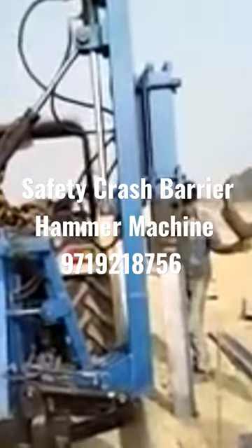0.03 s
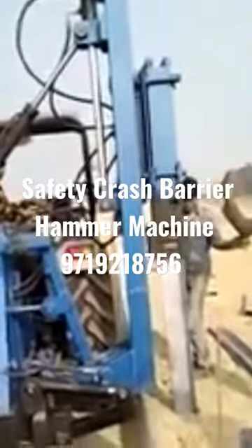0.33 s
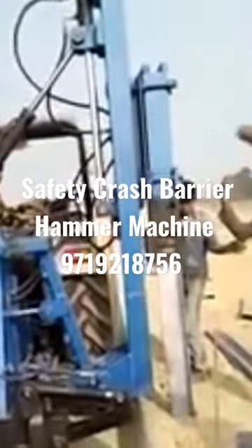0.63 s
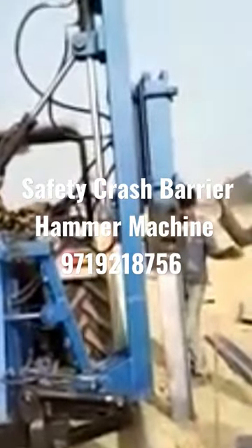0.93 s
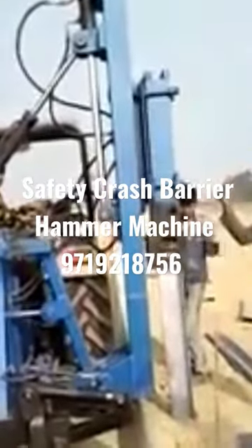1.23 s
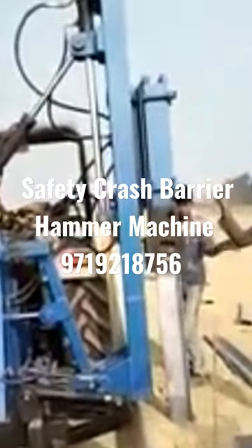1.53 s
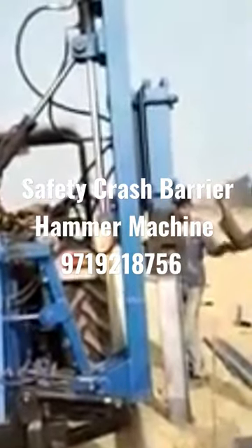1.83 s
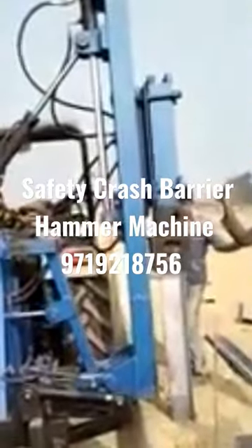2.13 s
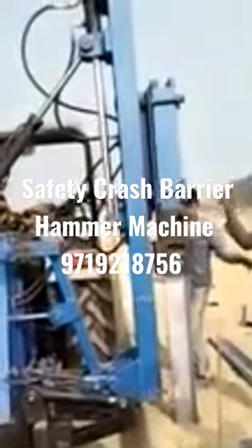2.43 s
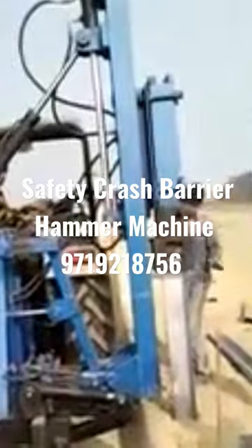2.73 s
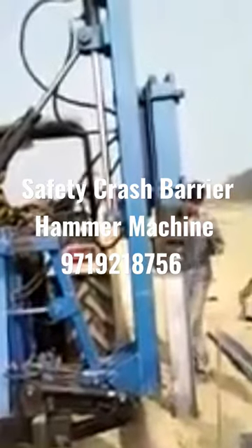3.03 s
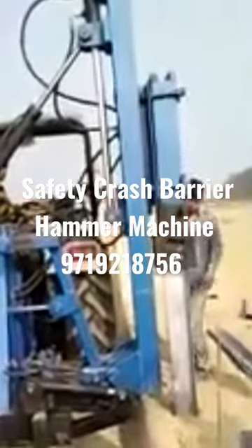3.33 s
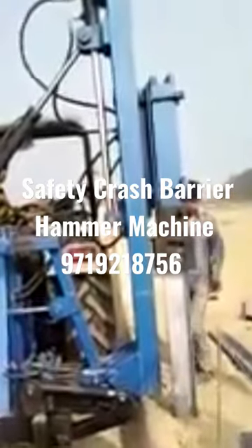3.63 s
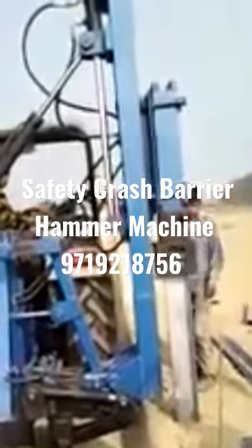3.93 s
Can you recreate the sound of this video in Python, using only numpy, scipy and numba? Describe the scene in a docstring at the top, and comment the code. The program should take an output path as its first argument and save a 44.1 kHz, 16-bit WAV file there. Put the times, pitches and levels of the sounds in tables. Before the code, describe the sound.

A hydraulic hammer pounds a steel post in fast, sharp, clattering blows that ring briefly, stalls for a moment midway, then carries on. A tractor's diesel engine rumbles steadily underneath, heard close by outdoors on a phone microphone.

```python
"""In the open air, close to a tractor whose hydraulic hammer drives a steel post; one phone microphone.
Nearly seven blows a second, with one short stall. Each cycle is a sharp valve tick, then the piston's
blow: post and hammer clatter and ring, and the hammer drops back with a knock.
The diesel runs on steadily underneath; the phone's gain control ducks it at every blow."""
import sys
import numpy as np
from scipy import signal
from scipy.fft import rfft, irfft
from scipy.io import wavfile
from numba import njit

SR = 44100
rng = np.random.default_rng(int(sys.argv[2]) if len(sys.argv) > 2 else 0)


def unload_wav(signal):
    """Save mono or channel-first audio to the path in sys.argv[1] as 16-bit WAV at rate SR, clipped to [-1, 1]."""
    wavfile.write(
        sys.argv[1],
        SR,
        np.round(np.clip(np.atleast_2d(signal).T, -1, 1) * 32767).astype(np.int16),
    )


N = 176400
AGE = np.arange(int(.4 * SR)) / SR  # seconds since a contact


def amp(db):
    """Decibels to gain."""
    return 10 ** (np.asarray(db) / 20)


def colour(x, points, size=4096):
    """Causal filter through (f/Hz, level/dB) points; white noise keeps its power."""
    hz, db = np.array(points, float).T
    bins_hz = np.arange(size // 2 + 1) * SR / size
    gain = amp(np.interp(np.log(bins_hz + 1), np.log(hz), db))
    cepstrum = irfft(np.log(gain / np.sqrt(np.mean(gain ** 2))))
    cepstrum[1:size // 2] *= 2  # fold to minimum phase
    cepstrum[size // 2 + 1:] = 0
    return signal.fftconvolve(x, irfft(np.exp(rfft(cepstrum))))[:len(x)]


def add(out, start_s, sound):
    """Mix a sound in at a time."""
    i = int(round(start_s * SR))
    part = sound[max(-i, 0):max(N - i, 0)]
    out[max(i, 0):max(i, 0) + len(part)] += part


def burst(db, decay_s):
    """A rough contact that dies away."""
    return amp(db) * np.exp(-AGE / decay_s) * rng.standard_normal(len(AGE))


def swell(rise_s):
    """Envelope that builds up to full level."""
    return 1 - np.exp(-AGE / rise_s)


def fade(hold_s, decay_s):
    """Envelope that holds, then dies away."""
    return np.exp(-np.maximum(AGE - hold_s, 0) / decay_s)


def ring(hz, db, t60):
    """One decaying mode."""
    return amp(db - 60 * AGE / t60) * np.sin(2 * np.pi * (hz * AGE + rng.random()))


# The diesel's firing rate: t/s, f/Hz
FIRING_RATE = [(0, 56.5), (.3, 58), (3.3, 57.5), (3.6, 57.5), (4, 57.5)]
# Spectra of the exhaust and of the pump and gears, as heard at the microphone: f/Hz, level/dB
EXHAUST_SPECTRUM = [(18, -9), (30, -13), (52, -20), (80, -2), (135, 0.5), (200, 1), (265, 1), (340, -3.5),
                    (450, -15), (900, -26.5), (15000, -70)]
GEAR_SPECTRUM = [(30, -23), (420, -11), (580, 1.5), (800, -0.5), (1100, -7), (1350, -4.5), (1700, -8.5),
                 (2500, -7.5), (3100, -17.5), (4000, -26), (5500, -24.5), (7000, -20.5), (8500, -29.5),
                 (11000, -32.5), (14000, -24), (15500, -35)]
def engine(drone_db=-33.5, exhaust_db=-28, gear_db=-25):
    """The bed of the scene: diesel drone, an exhaust puff at each firing, the noise of pump and gears."""
    firing_hz = np.interp(np.arange(N) / SR, *np.array(FIRING_RATE).T)
    phase = 2 * np.pi * np.cumsum(firing_hz) / SR
    harmonics_db = [3, 3, -5.5, -2, -11.5, -20]
    drone = -np.sqrt(2) * sum(amp(db) * np.cos(k * phase) for k, db in enumerate(harmonics_db, 1))
    puffs = colour(rng.standard_normal(N) * (1 + .57 * np.cos(phase)), EXHAUST_SPECTRUM)
    gears = colour(rng.standard_normal(N) * (1 + .1 * np.cos(phase)), GEAR_SPECTRUM)
    return amp(drone_db) * drone + amp(exhaust_db) * puffs + amp(gear_db) * gears


# The hammer's cycles, shared by the sources below: t/s of the blow, level/dB, time loose/s,
# drop-back delay/s, drop-back level/dB, then level/dB for each of the post's four main modes
BLOWS = [(-0.024, -3, 0.065, 0.079, 0, 6, -2, 12, 4), (0.1236, 0.3, 0.062, 0.056, 1.0, 7, -4, 1.0, 3),
         (0.3438, -1.8, 0.054, 0.057, 3, -0.5, -11, 6, -5),
         (0.4914, -2.8, 0.072, 0.071, -5, -2, -8, 2.0, -5),
         (0.6398, -2.8, 0.082, 0.066, -6, 1, -15, 4, -4.0),
         (0.8132, -2.5, 0.083, 0.062, 1.5, -4, 0.5, -1.0, -5.0),
         (0.9851, -1.3, 0.09, 0.065, 3, 0.5, -20, 3, -13),
         (1.1349, -2.7, 0.082, 0.068, -5.5, 0.5, 2, -12, -10),
         (1.2816, -2.2, 0.066, 0.056, 0, -1.5, -1, -12, -0.5),
         (1.4273, -1.7, 0.082, 0.063, 3.0, -4, 5, 5, 0.5), (1.5752, -1.5, 0.071, 0.055, 6, -10, 4.0, 1, 11),
         (1.7222, -1.6, 0.069, 0.06, 4.5, -2, -1, 4, 8.5),
         (1.8675, -0.7, 0.054, 0.043, 0, 1.5, 5, 0.0, -0.0),
         (2.2418, -1, 0.045, 0.037, 9, -3, -6, -12, -4.5), (2.3922, -0.3, 0.066, 0.054, 1, -7, -2, 4, 3),
         (2.5434, 0.5, 0.054, 0.033, 8, 2, -2, 13, 6.5), (2.6919, -0.5, 0.046, 0.051, 3.5, -10, 3.0, 4, 5),
         (2.8414, -2, 0.056, 0.057, 2, -9, -4, 15, 11.5), (2.9898, 0, 0.05, 0.042, 7, -3, -1, 6, 4),
         (3.1377, -0.5, 0.059, 0.038, 2, 0, 0, -7, 11.5), (3.2859, -2, 0.058, 0.05, 1, -2.0, 2.0, 3, 4.5),
         (3.4324, -1.5, 0.061, 0.031, -15, -18, -6, 2, 5), (3.581, -1.9, 0.048, 0.045, 1, -1.5, -1, 7, 6),
         (3.7295, -3.5, 0.056, 0.036, 6.5, -7, -1.5, 0, 5),
         (3.8769, -2.5, 0.058, 0.05, 3, -18, -2.5, 0.0, -1)]
# Spectrum of the valve's tick: f/Hz, level/dB
TICK_SPECTRUM = [(300, -27), (900, 0), (1800, -8), (3200, -15), (4600, -4.5), (6200, 7), (7300, 8.5),
                 (8000, 3.5), (8700, 5), (9700, 2.5), (10800, -12.5), (13800, 12), (15500, -11)]
# The valve's modes: f/Hz; and, row for row, their ring: level/dB, t60/s
VALVE_HZ = [947, 1275, 2234, 2648, 3267, 4209, 4360, 5760, 5910, 6616, 7305, 9657, 11574]
VALVE_RING = [(-23, 0.18), (-28, 0.18), (-27, 0.11), (-22, 0.049), (-21, 0.072), (-22, 0.11),
              (-33.5, 0.072), (-33.5, 0.15), (-25.5, 0.098), (-22, 0.031), (-14, 0.012), (-28, 0.038),
              (-32, .035)]
def valve(lead_s=.016):
    """The valve snaps over just before every blow, always alike, and rings briefly."""
    ticks, rings = np.zeros((2, N))
    snap = burst(db=-13, decay_s=.0039)
    for start, *_ in BLOWS:
        add(ticks, start - lead_s, snap + burst(db=-13, decay_s=.0065))
        add(rings, start - lead_s, sum(ring(hz, *mode) for hz, mode in zip(VALVE_HZ, VALVE_RING)))
    return colour(ticks, TICK_SPECTRUM) + rings


def ground(hz=13, db=-17, width_s=.018):
    """A faint, very deep thump underfoot, centred on every blow."""
    out = np.zeros(N)
    t = AGE - AGE.mean()
    push = -amp(db) * np.exp(-(t / width_s) ** 2) * np.sin(2 * np.pi * hz * t)
    for start, *_ in BLOWS:
        add(out, start - AGE.mean(), push)
    return out


# Spectra of the piston's first contact: f/Hz, level/dB
CRACK_SPECTRUM = [(200, -20), (700, 5), (1400, 1), (2600, -5), (3600, -15), (5000, -17), (7000, -5),
                  (10000, -3), (13500, 2), (15500, -7)]
THUD_SPECTRUM = [(100, -28), (400, -19), (580, -3), (720, 2), (900, -2), (1100, -10), (1400, -10),
                 (2000, -20), (4000, -38), (15000, -55)]
def piston(level_db=-6.5):
    """The piston lands: a bright crack over a slightly longer thud."""
    crack, thud = np.zeros((2, N))
    for start, db, *_ in BLOWS:
        add(crack, start, burst(level_db + db, decay_s=.0019))
        add(thud, start, burst(level_db + db, decay_s=.0054))
    return colour(crack, CRACK_SPECTRUM) + colour(thud, THUD_SPECTRUM)


# Spectrum of steel rattling on steel: f/Hz, level/dB
CLATTER_SPECTRUM = [(60, -22), (400, -14), (520, -6), (660, 5), (830, 1.5), (1100, -5.5), (1400, -5),
                    (1700, -10.5), (2300, -8), (3250, -7.5), (3700, -15.5), (4600, -18.5), (5800, -16),
                    (7000, -10.5), (7800, -19), (11000, -19), (13000, -14), (14500, -9.5), (15500, -36)]
def clatter(level_db=-6.5, roughness=.31, grain_samples=20):
    """A rush of uneven contacts while the hammer is loose on the post."""
    out = np.zeros(N)
    for start, db, loose_s, *_ in BLOWS:
        grains = np.repeat(rng.standard_normal(len(AGE) // grain_samples), grain_samples)
        contacts = np.exp(roughness * grains - roughness ** 2)
        shape = fade(hold_s=.018, decay_s=.023) * fade(loose_s, decay_s=.027)
        add(out, start, amp(level_db + db) * shape * contacts * rng.standard_normal(len(AGE)))
    return colour(out, CLATTER_SPECTRUM)


# The post's modes, the four main ones first: f/Hz; and, row for row: level/dB, build-up/s, t60/s
POST_HZ = [1324, 2750, 3095, 7123, 665, 2053, 5915, 6905, 8548, 11452, 11672, 12745, 13622, 14478]
POST_RING = [(-8.5, 0.0099, 0.26), (-3.5, 0.004, 0.089), (-18, 0.0072, 0.23), (-17, 0.018, 0.27),
             (-19, 0.0064, 0.18), (-22, .005, 0.18), (-28, 0.01, 0.13), (-23.5, .015, 0.19),
             (-20.5, 0.011, 0.3), (-32, 0.023, 0.41), (-22, .035, 0.39), (-22, 0.0064, 0.2),
             (-21, .012, 0.24), (-21, 0.0069, 0.15)]
def post(scatter_db=4.5, high_hz=2900, split_hz=14, twin_gain=.55):
    """The clatter pumps the post's modes, differently each time; the seated hammer damps the high ones."""
    out = np.zeros(N)
    for start, db, loose_s, _, _, *main_db in BLOWS:
        for k, (hz, (mode_db, rise_s, t60)) in enumerate(zip(POST_HZ, POST_RING)):
            scatter, detune, split = rng.standard_normal(3)
            level_db = mode_db + (main_db[k] if k < len(main_db) else db + scatter_db * scatter)
            pitch = hz * (1 + .001 * detune)
            tone = ring(pitch, level_db, t60)
            if hz > high_hz:  # each high mode is a close pair that beats
                twin = ring(pitch + split_hz * (1 + split / 2), level_db, t60)
                pair = (tone + twin_gain * twin) / np.hypot(1, twin_gain)
                tone = pair * fade(loose_s, decay_s=.007)
            add(out, start, tone * swell(rise_s))
    return out


def jangle(count=100, level_db=-3.5, t60=.13):
    """Dense small modes of the steel frame, coloured like the clatter; each blow stirs a new mix."""
    hz = np.linspace(900, 15000, count)
    hz += (hz[1] - hz[0]) * (rng.random(count) - .5)
    modes = np.exp(2j * np.pi * hz[:, None] * AGE) / np.sqrt(count)
    shape = swell(rise_s=.0065) * amp(-60 * AGE / t60)
    out = np.zeros(N)
    for start, db, loose_s, *_ in BLOWS:
        mix = rng.standard_normal(count) + 1j * rng.standard_normal(count)
        add(out, start, amp(level_db + db) * (mix @ modes).real * shape * fade(loose_s, decay_s=.072))
    return colour(out, CLATTER_SPECTRUM)


# Spectrum of the hammer's dull knock: f/Hz, level/dB
KNOCK_SPECTRUM = [(100, -32), (440, -22), (570, -4), (680, 2), (850, -2), (1100, -11), (1400, -12),
                  (2000, -22), (3500, -40), (15000, -65)]
def drop_back(level_db=-12.5, stall_s=2.069, stall_db=-4.5):
    """The hammer settles on the post after each blow and once in the stall: a soft, spread-out contact."""
    knocks = [(start + delay_s, level_db + db) for start, _, _, delay_s, db, *_ in BLOWS]
    out = np.zeros(N)
    for start, db in knocks + [(stall_s, stall_db)]:
        add(out, start, burst(db, decay_s=.009) * swell(rise_s=.003))
    return colour(out, KNOCK_SPECTRUM)


def scene():
    """Tractor, hammer and post as they reach the microphone: mono, in the open air."""
    return (engine() + valve() + ground() + piston() + clatter() + post() + jangle() + drop_back())[None]


@njit
def follow(x, attack_s, release_s):
    """Level follower, already settled at the start: quick to rise, slow to fall."""
    out, level = np.empty(len(x)), np.max(x[:64])
    for i in range(len(x)):
        level += (x[i] - level) / (SR * (attack_s if x[i] > level else release_s))
        out[i] = level
    return out


def record(dry, threshold_db=-21, ratio=3.15, makeup_db=2, top_hz=14950):
    """The phone: its gain control ducks at every blow, peaks are rounded off and the top is cut."""
    level = follow(np.abs(dry[0]), attack_s=.00067, release_s=.079)
    gain = np.maximum(level / amp(threshold_db), 1) ** (1 / ratio - 1)
    rounded = np.tanh(dry * gain * amp(makeup_db))
    return signal.sosfilt(signal.ellip(8, .3, 70, top_hz, fs=SR, output="sos"), rounded)


dry = scene()
out = record(dry)
unload_wav(out)
```